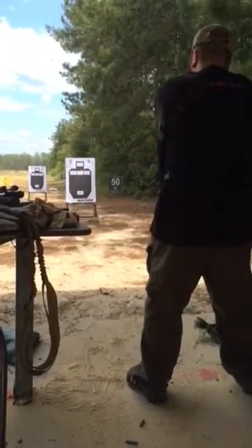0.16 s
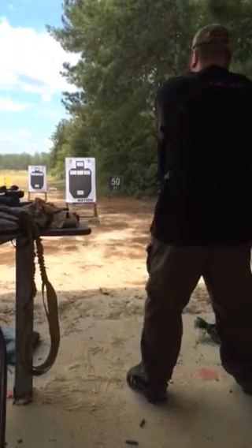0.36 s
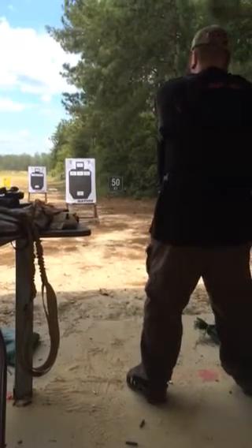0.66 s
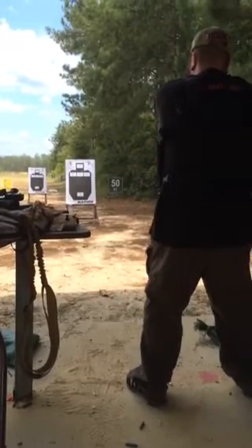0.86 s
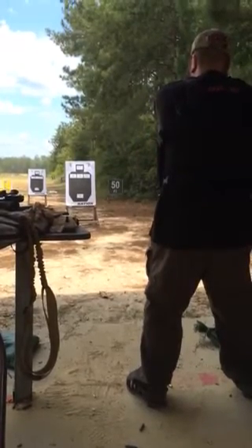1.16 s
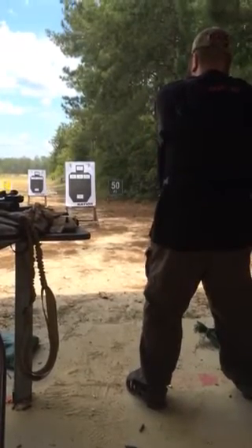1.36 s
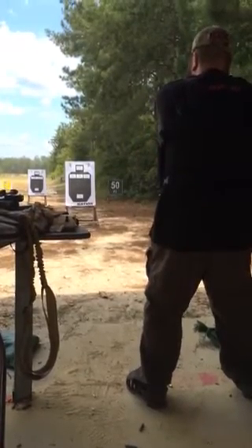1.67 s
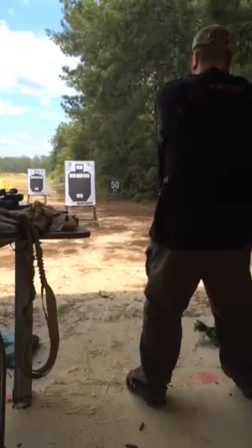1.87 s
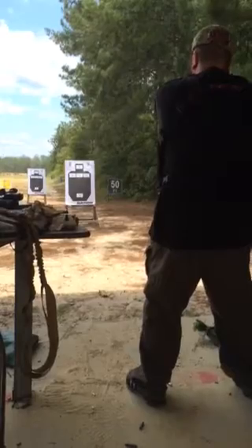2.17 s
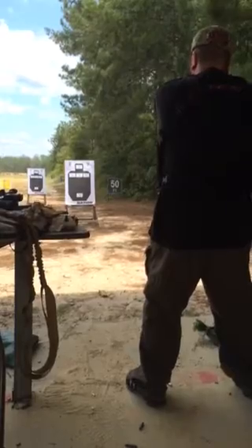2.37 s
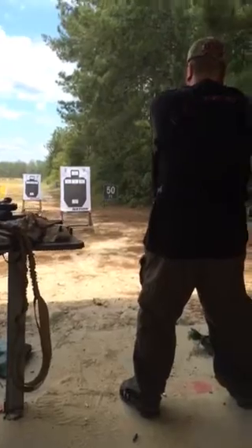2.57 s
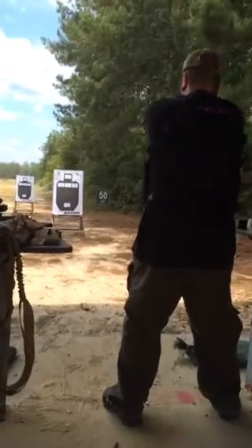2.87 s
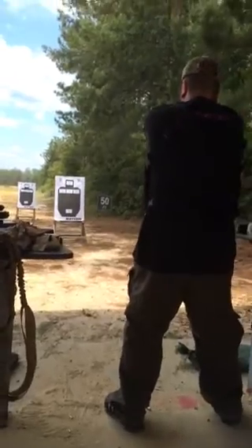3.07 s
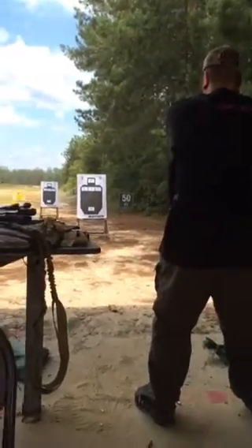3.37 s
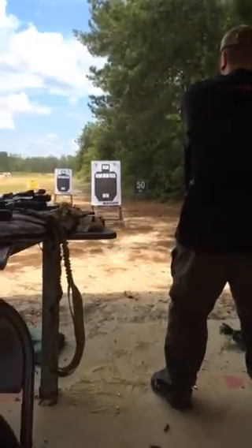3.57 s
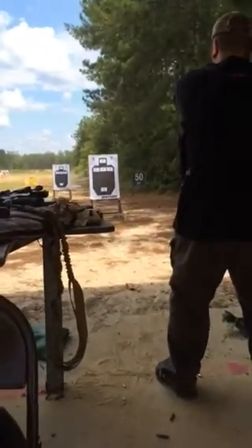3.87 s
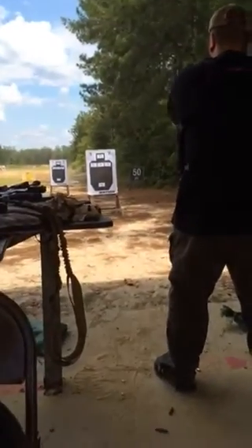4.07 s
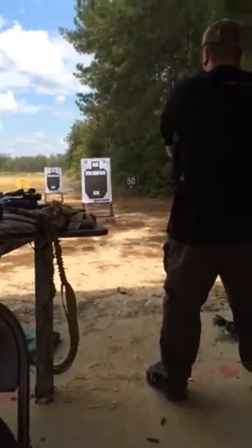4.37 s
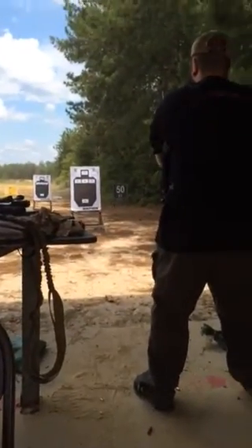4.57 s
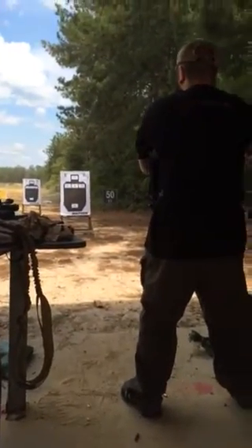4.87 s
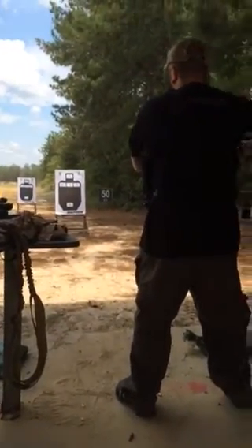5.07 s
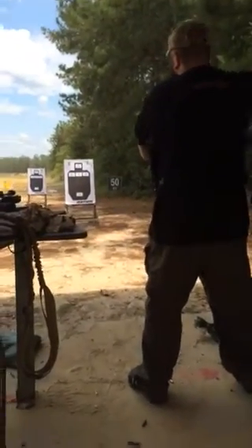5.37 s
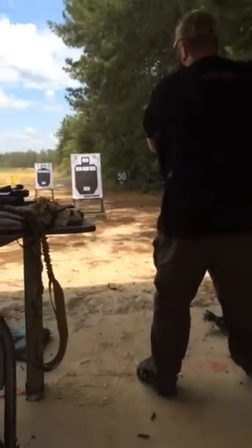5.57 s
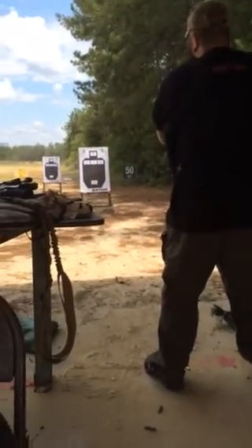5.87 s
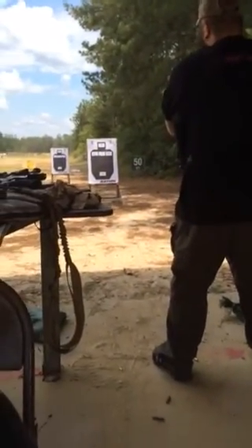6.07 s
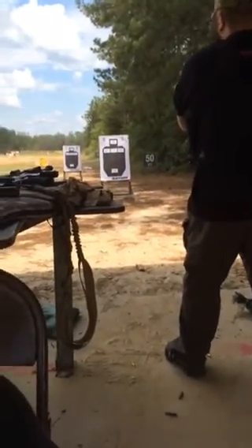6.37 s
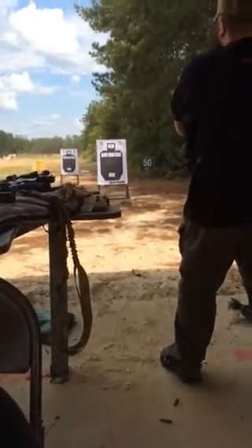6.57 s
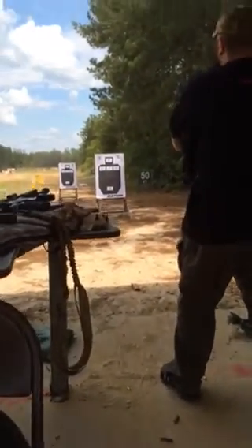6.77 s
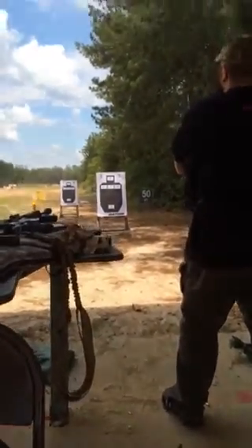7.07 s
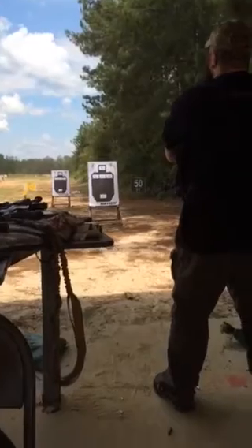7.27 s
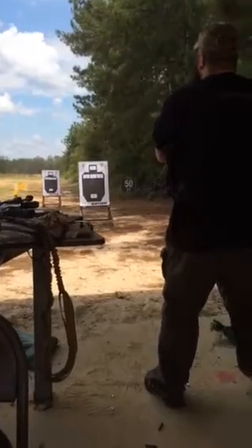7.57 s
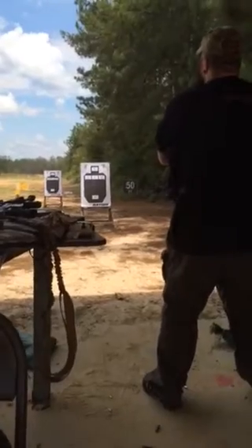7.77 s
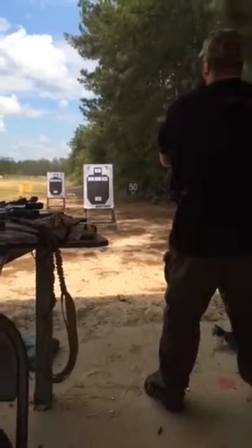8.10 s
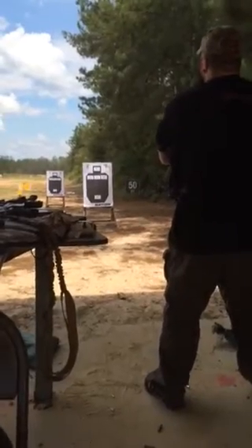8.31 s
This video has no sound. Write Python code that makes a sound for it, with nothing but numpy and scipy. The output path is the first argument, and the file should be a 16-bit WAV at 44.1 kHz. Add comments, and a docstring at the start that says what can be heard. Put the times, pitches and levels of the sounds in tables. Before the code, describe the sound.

Close, slightly squashed sound from a handheld microphone behind a shooter: distant pops and a low engine drone, two violent pistol blasts with dense shelter reverberation and long forest echo, small metal clicks, a loud steel clack that rings, a casing tinkle, dull gear knocks, soft swishes, then the drone sinks to a faint hum under far grainy reports.

```python
"""Pistol shots on an outdoor firing line

Two shots under a roof overload a fast limiter; each is a noise burst with roof and tree echoes made of dying noise.
Gun parts clack as shaped noise; they and a casing ring as fading sines; faint far reports are grainy rushes of noise.
A far engine, a stack of sines, drones, then the drone sinks to a low hum.
Soft swishes, a squeak, a whine and quiet air are around it."""
import sys
import numpy as np
from scipy import signal
from scipy.fft import rfft, irfft, next_fast_len
from scipy.io import wavfile
from scipy.ndimage import uniform_filter1d, map_coordinates

SR = 44100
rng = np.random.default_rng(int(sys.argv[2]) if len(sys.argv) > 2 else 0)


def master(y):
    """Save y as 16-bit WAV."""
    cut = np.clip(np.atleast_2d(y).T, -1, 1)
    pcm = np.round(cut * 32767)  # scale
    wavfile.write(sys.argv[1], SR, pcm.astype(np.int16))


N = 372204


def amp(db):
    """Turn decibels into a gain."""
    return 10 ** (np.asarray(db) / 20)


def unit(x):
    """Scale to an rms of 1."""
    return x / np.sqrt(np.mean(x ** 2) + 1e-20)


def along(points, hz):
    """Read a curve of (Hz, value) points, spaced evenly in log pitch."""
    point_hz, values = np.transpose(points)
    return np.interp(np.log(hz + 1), np.log(point_hz + 1), values)


def wobble(rate):
    """Draw a smooth random curve with rate random knots a second."""
    knots = rng.standard_normal(int(N * rate / SR) + 4)
    return map_coordinates(knots, [np.arange(N) * rate / SR])


def noise(colour, size):
    """Make noise of rms 1 from random phases; colour(hz) gives the shape of its spectrum in dB."""
    hz = np.fft.rfftfreq(size, 1 / SR)
    phases = np.exp(2j * np.pi * rng.random(len(hz)))
    return unit(irfft(phases * amp(colour(hz)), size))


def tilted(points, tilt, hz):
    """Lean a spectrum by tilt dB per octave above 900 Hz."""
    return along(points, hz) + tilt * np.log2(np.maximum(hz, 900))


def dying(x, t60s):
    """Let each frequency die at its own speed, falling 60 dB in its t60."""
    hz, t, frames = signal.stft(x, SR, nperseg=512)
    fade = amp(-60 * t / along(t60s, hz)[:, None])
    return signal.istft(frames * fade, SR, nperseg=512)[1][:len(x)]


def add(track, s, sound):
    """Mix a sound into the track at s seconds."""
    start = max(round(s * SR), 0)
    track[start:start + len(sound)] += sound[:N - start]


def walls(hz, depth_db, farthest, count=12):
    """Ripple a spectrum as nearby surfaces do, their reflections up to farthest seconds late."""
    delays = farthest * rng.uniform(.15, 1, (count, 1))
    ripple = unit(np.cos(2 * np.pi * delays * hz).sum(axis=0))
    return depth_db * ripple * hz / (hz + 700)  # weaker in the bass


def surges(returns, t):
    """Give the lift in dB from a table of echoes, each a smooth bump in time."""
    return sum(db * np.exp(-((t - delay) / length) ** 2) for delay, length, db in returns)


# Spectrum of the outdoor air: pitch_hz, relative level_db
AIR_SPECTRUM = [(20, -18.5), (45, -4.5), (65, -0.5), (115, -10), (165, -3), (280, -16), (600, -18),
                (1200, -23.5), (2500, -28.5), (5000, -34), (10000, -39.5), (15500, -47.5)]


def air(level_db=-59.5, sway_db=1, buffet_db=3, buffet_hz=250):
    """Quiet leaf hiss lies over a rumble that the breeze stirs in quick lumps."""
    steady = noise(lambda hz: along(AIR_SPECTRUM, hz), next_fast_len(N))[:N]
    bass = signal.sosfiltfilt(signal.butter(2, buffet_hz, fs=SR, output="sos"), steady)
    hiss = steady - bass
    lumps = unit(amp(buffet_db * wobble(15)))
    return amp(level_db + sway_db * wobble(1.6)) * (hiss + lumps * bass)


# Lines of the drone: multiple of the five-firing cycle, relative level_db
ENGINE_LINES = [(4, -12.5), (5, 0.5), (6, -5), (7, -15.5), (8, -15.5), (9, -13), (10, -14.5), (11, -15),
                (12, -19)]
# Loudness of the drone over time: time_s, level_db
ENGINE_LOUDNESS = [(0, -50.5), (1.15, -48), (1.5, -55), (3, -62.5), (4.5, -57.5), (5.4, -63), (6.25, -59.5),
                   (6.55, -82), (8.44, -63)]
# Firing rates: the engine picks up to its working speed, then its drone sinks to a low hum
START_HZ, WORK_HZ, LOW_HUM_HZ = 85, 92, 58
PICK_UP_S, SINK_AT_S, SINK_S = .6, 5.4, .25


def engine(unsteady_db=2.0, throb_db=1.3):
    """Uneven firings put lines at multiples of the engine cycle, which throb together once a cycle."""
    t = np.arange(N) / SR
    working_hz = WORK_HZ + (START_HZ - WORK_HZ) * np.exp(-t / PICK_UP_S)
    height = (1 - np.tanh((t - SINK_AT_S) / SINK_S / 2)) / 2  # 1 for the drone, 0 for the low hum
    firing_hz = LOW_HUM_HZ + (working_hz - LOW_HUM_HZ) * height
    cycle = 2 * np.pi * np.cumsum(firing_hz / 5) / SR  # phase; five firings make one cycle
    lines = sum(amp(db + unsteady_db * wobble(5.9)) * np.sin(multiple * cycle) for multiple, db in ENGINE_LINES)
    level_db = np.interp(t, *np.transpose(ENGINE_LOUDNESS))
    return amp(level_db + throb_db * wobble(20)) * unit(lines)


def whine(level_db=-71, pitch_hz=760, width_hz=20, middle=.9, length=.6):
    """A faint whine, a narrow band of noise, comes and goes in the distance."""
    band = noise(lambda hz: -20 * np.log10(1 + ((hz - pitch_hz) / width_hz) ** 2), next_fast_len(N))[:N]
    swell = np.exp(-((np.arange(N) / SR - middle) / length) ** 2)
    return amp(level_db) * band * swell


# Spectrum of far reports and swishes: pitch_hz, relative level_db
FAR_SPECTRUM = [(300, 1), (1000, -0.5), (1700, -2.5), (2700, 1), (4500, -6), (7000, -9.5), (10000, -16.5),
                (15500, -25)]
GROUND_COMB_HZ = 880  # spacing of the peaks made by the bounce off the ground


def far_rush(tilt, low_hz, size, edge_damping=0.78, grain_db=2.2, ground_db=0.5):
    """A grainy rush with a steep lower edge is combed by its bounce off the ground."""
    high_pass = lambda ratio: ratio ** 2 / abs(1 - ratio ** 2 + 1j * edge_damping * ratio)
    edge = lambda hz: 2 * 20 * np.log10(high_pass(hz / low_hz) + 1e-6)  # the filter twice over
    ground = lambda hz: ground_db * np.cos(2 * np.pi * hz / GROUND_COMB_HZ) / (1 + (hz / 4000) ** 2)
    ripple = lambda hz: walls(hz, depth_db=4, farthest=.008)
    rush = noise(lambda hz: tilted(FAR_SPECTRUM, tilt, hz) + edge(hz) + ground(hz) + ripple(hz), size)
    trunks = wobble(500)[:size]
    return unit(rush * amp(grain_db * trunks))


# Spectrum of dull bodies and thuds: pitch_hz, relative level_db
KNOCK_SPECTRUM = [(40, -37), (150, -2), (300, -1.5), (450, -0.5), (700, -6.5), (1200, -11.5), (3000, -25),
                  (10000, -72)]
# Reports from other lanes: start_s, level_db, hold_s (from the start), tilt_db_per_octave, dull_body_db
FAR_REPORTS = [(.027, -52, .085, 4.5, -60), (.075, -47.5, .04, -6, -59), (.536, -50.5, .012, 6, -54),
               (.702, -48.5, 0.03, 1.5, -53), (5.85, -56.5, .05, 2.5, -57), (6.263, -43.5, 0.024, 1.5, -52),
               (6.971, -45.5, 0.048, 1, -60), (7.306, -52.5, 0.054, 3, -67), (7.642, -42.5, 0.055, 0, -66),
               (7.962, -45, 0.074, .5, -66)]
REPORT_RISE_S, REPORT_LOW_HZ = .01, 980
EDGE_CLIMB = .08  # octaves the lower edge climbs per dB of tilt, so a brighter report has less bass


def reports(t60=0.25):
    """A far crack comes back from many trees at once: it rises, holds and dies, over a dull body."""
    out, t = np.zeros(N), np.arange(SR // 2) / SR
    for s, db, hold, tilt, body_db in FAR_REPORTS:
        body = amp(body_db) * noise(lambda hz: along(KNOCK_SPECTRUM, hz), len(t))
        shape = np.minimum(t / REPORT_RISE_S, 1) * amp(-60 * np.maximum(t - hold, 0) / t60)
        rush = far_rush(tilt, REPORT_LOW_HZ * 2 ** (EDGE_CLIMB * tilt), len(t))
        add(out, s, (amp(db) * rush + body) * shape)
    return out


def squeak(middle=0.065, length=0.014, pitch_hz=791, level_db=-41):
    """A brief, nearly pure squeak is one sine that swells and fades."""
    t = np.arange(N) / SR
    return amp(level_db) * np.sin(2 * np.pi * pitch_hz * t) * np.exp(-((t - middle) / length) ** 2)


# Soft swishes: peak_s, level_db, tilt_db_per_octave
SOFT_SWISHES = [(.205, -64, 6), (5.14, -55, 4), (6.105, -53, -2.5), (6.638, -51, 0.5)]
SWISH_S, SWISH_LOW_HZ = .05, 1350


def swishes():
    """The rush of a far report, but without an attack, swells and fades evenly."""
    out, t = np.zeros(N), np.arange(SR // 3) / SR
    middle = t.mean()
    swell = np.exp(-((t - middle) / SWISH_S) ** 2)
    for s, db, tilt in SOFT_SWISHES:
        add(out, s - middle, amp(db) * far_rush(tilt, SWISH_LOW_HZ, len(t)) * swell)
    return out


# Spectrum of clatter: pitch_hz, relative level_db
CLATTER_SPECTRUM = [(200, -31), (700, -18), (1250, -0.5), (1800, 1.5), (2600, -2.5), (4000, -4),
                    (6500, -4.5), (10000, -12), (15500, -21)]
CLATTER_LOW_HZ = 700  # clatter has little bass below this edge


def contact(level_db, snap_db, thud_db, body_hz, tilt, t60, lift_db,
            snap_length=0.0034, thud_t60=.35, thud_rise=0.0026, body_q=7):
    """A hard contact snaps in the part's own resonance, then clatters under the roof over a dull thud."""
    t = np.arange(SR // 2) / SR
    body = lambda hz: lift_db / (1 + (2 * body_q * (hz / body_hz - 1)) ** 2)
    ripple = lambda hz: walls(hz, depth_db=3.5, farthest=.004)
    snap = amp(snap_db) * np.exp(-(t / snap_length) ** 4)
    shape = snap + amp(-60 * t / t60)
    clatter = noise(lambda hz: tilted(CLATTER_SPECTRUM, tilt, hz) + body(hz) + ripple(hz), len(t)) * shape
    clatter = signal.sosfilt(signal.butter(2, CLATTER_LOW_HZ, "high", fs=SR, output="sos"), clatter)
    thud_shape = amp(-60 * t / thud_t60) * (1 - np.exp(-t / thud_rise))
    thud = noise(lambda hz: along(KNOCK_SPECTRUM, hz), len(t)) * thud_shape
    return amp(level_db) * clatter / np.sqrt(2) + amp(thud_db) * thud  # clatter sits 3 dB below level_db


# Sharp clicks of steel gun parts: start_s, clatter_db (before a 3 dB cut), snap_db (above the clatter),
# thud_db, body_hz
STEEL_CLICKS = [(.796, -52, 0, -56, 4600), (.83, -46.5, 4, -56, 2400), (2.4722, -33.5, 1.5, -64, 4240),
                (2.637, -42.5, 2, -50, 4000), (3.778, -50, 0, -56, 7000), (3.9085, -35.5, 4, -65, 4300),
                (4.2929, -23, 0, -37, 3060), (4.4679, -41, 5.5, -42, 6200), (4.562, -53, 3, -55, 10500),
                (6.4989, -28, 8, -63, 1280), (6.856, -38.5, 2.5, -42.5, 6600)]
# Duller knocks of gear on the bench: start_s, clatter_db (before a 3 dB cut), thud_db, body_hz
BENCH_KNOCKS = [(4.490, -31.5, -37.5, 2280), (4.664, -59, -47, 1500), (4.785, -47.5, -37, 2780),
                (5.124, -52.5, -54.5, 3400), (5.451, -41.5, -44.5, 3160), (5.518, -55, -44.5, 1790),
                (5.661, -55.5, -52, 1900), (5.711, -47.5, -53.5, 1750)]


def clacks():
    """Steel on steel is bright; gear on the bench is duller and rings more in its body."""
    out = np.zeros(N)
    for s, db, snap_db, thud_db, body_hz in STEEL_CLICKS:
        add(out, s, contact(db, snap_db, thud_db, body_hz, tilt=2.1, t60=0.21, lift_db=7.5))
    for s, db, thud_db, body_hz in BENCH_KNOCKS:
        add(out, s, contact(db, 2.5, thud_db, body_hz, tilt=-4.5, t60=.22, lift_db=11))
    return out


# Spectrum of the shelter's reverberation: pitch_hz, relative level_db
SHELTER_SPECTRUM = [(30, -37), (70, -22.5), (130, -10), (300, -3), (600, 0.5), (1200, 1.5), (1700, -4.5),
                    (3000, -5.5), (5000, -10), (8000, -13.5), (12000, -22), (15500, -27.5)]
# How fast the shelter dies away: pitch_hz, t60_s
SHELTER_DECAY = [(70, 0.78), (170, .75), (400, 0.56), (1000, 0.48), (4000, 0.45), (8000, 0.4), (14000, 0.4)]
# Resonances of the shelter: pitch_hz, width_hz, lift_db
ROOF_RESONANCES = [(123, 24, 6), (310.4, 22, 9.5), (396, 40, 6), (468, 37, 5), (584, 19, 3),
                   (659.5, 61, 4.5), (685, 14, 5.5), (734, 17, 5.5), (805, 50, 6), (880, 14, 5.5),
                   (932, 16, 5), (1139, 20, 5), (1236, 14, 6), (1620, 8.3, 4), (1937, 19, 6.5),
                   (2528, 13, 5.5), (3140, 26, 5)]
# Strong returns from posts, benches and the side bank: delay_s, length_s, lift_db
BANK_RETURNS = [(.065, .025, 4.5), (.115, .012, 4), (.205, .012, 1.5)]


def shelter(t, level_db=1, build=0.018, lumps_db=1.3):
    """Reflections pile up in lumps between slab and roof and ring at the shelter's resonances."""
    resonances = lambda hz: sum(db / (1 + (2 * (hz - f) / w) ** 2) for f, w, db in ROOF_RESONANCES)
    ripple = lambda hz: walls(hz, depth_db=1.5, farthest=.03)
    colour = lambda hz: along(SHELTER_SPECTRUM, hz) + resonances(hz) + ripple(hz)
    swell_db = level_db + surges(BANK_RETURNS, t) + lumps_db * wobble(200)[:len(t)]
    return amp(swell_db) * dying(noise(colour, len(t)), SHELTER_DECAY) * (1 - np.exp(-t / build))


# Spectrum of the forest's echo: pitch_hz, relative level_db
FOREST_SPECTRUM = [(30, -25), (70, -12), (140, -3), (300, -3.5), (600, 0), (1100, -1.5), (1700, -8.5),
                   (3000, -13), (5000, -19.5), (8000, -28.5), (12000, -36), (15500, -44)]
# How fast the forest dies away: pitch_hz, t60_s
FOREST_DECAY = [(70, 6.1), (200, 5.84), (600, 4.25), (1500, 3.8), (4000, 3.36), (8000, 3.2), (14000, 2.2)]
# Clumps of trees that answer more strongly: delay_s, length_s, lift_db
TREE_CLUMPS = [(.245, .012, 1), (.403, .018, 3), (.545, .02, 2), (.655, .014, 5), (.795, .035, 4)]


def forest(t, level_db=-28, build=.3, lumps_db=1.6):
    """Countless trunks scatter the blast back in lumps; denser clumps stand out as echoes."""
    colour = lambda hz: along(FOREST_SPECTRUM, hz) + walls(hz, depth_db=2.0, farthest=0.018)
    swell_db = level_db + surges(TREE_CLUMPS, t) + lumps_db * wobble(45)[:len(t)]
    return amp(swell_db) * dying(noise(colour, len(t)), FOREST_DECAY) * (1 - np.exp(-t / build))


def roll(t, level_db=-28, centre_hz=210, steepness=13, t60=2.6, build=.15):
    """The bass rolls back from the nearby ground and banks sooner than the forest answers."""
    rumble = noise(lambda hz: -steepness * np.log2((hz + 1) / centre_hz) ** 2, len(t))
    return amp(level_db - 60 * t / t60) * rumble * (1 - np.exp(-t / build))


def boom(t, level_db=-19, pitch_hz=70, delay=.065, length=.014):
    """The roof heaves briefly under the pressure wave: a low sine that swells and fades."""
    return amp(level_db) * np.sin(2 * np.pi * pitch_hz * (t - delay)) * np.exp(-((t - delay) / length) ** 2)


# Spectrum of the first blast: pitch_hz, relative level_db
BLAST_SPECTRUM = [(100, -27.5), (400, -9.5), (1000, -4.5), (1700, -1.5), (2500, -3.5), (4200, -1.5),
                  (8000, -5), (12000, -9), (15500, -11)]
# The pistol shots: start_s, level_db (added to the levels of blast and echoes)
PISTOL_SHOTS = [(1.2574, -1), (3.1024, -1)]


def pistol(blast_db=6, blast_t60=.2):
    """Each shot is a new bright blast, answered in the same way by the same surroundings."""
    out, t = np.zeros(N), np.arange(5 * SR) / SR
    answer = shelter(t) + forest(t) + roll(t) + boom(t)
    for s, db in PISTOL_SHOTS:
        blast = noise(lambda hz: along(BLAST_SPECTRUM, hz), len(t)) * amp(blast_db - 60 * t / blast_t60)
        add(out, s, amp(db) * (blast + answer))
    return out


# Ringing tones of a heavy steel gun part: pitch_hz, relative level_db, t60_s
HEAVY_PART = [(1980, -4.5, 0.19), (2110, -2.5, 0.1), (2370, -6.5, 0.13), (3280, -15, 0.14),
              (3970, -6.5, 0.12), (5500, -20, .13), (7060, -14, 0.16), (8603, -14, 0.16),
              (10510, -15, 0.17), (11300, -16, .11), (13010, -19, .1), (13970, -22, .13)]
# Ringing tones of a light gun part and a shell casing landing: pitch_hz, relative level_db, t60_s
LIGHT_PART_AND_CASING = [(1604, 2, 0.13), (3900, -10, .11), (6080, -4, 0.087), (7047, -21, 0.45),
                         (7644, -21.5, .2), (9800, -12, .11), (13510, -28, .35)]


def ringing_metal(s, modes, level_db):
    """Struck metal rings in its modes, each a sine that dies at its own speed."""
    out, t = np.zeros(N), np.arange(SR) / SR
    for hz, db, t60 in modes:
        add(out, s, amp(db - 60 * t / t60) * np.sin(2 * np.pi * hz * t) * rng.choice([-1, 1]))
    return amp(level_db) * out


def scene():
    """Mix everything heard on the firing line."""
    background = air() + engine() + whine()
    far = reports() + squeak() + swishes()
    heavy_ring = ringing_metal(4.2928, HEAVY_PART, level_db=-20.5)
    light_ring = ringing_metal(4.4678, LIGHT_PART_AND_CASING, level_db=-30.5)
    return (background + far + clacks() + pistol() + heavy_ring + light_ring)[None]


TOP_HZ = 15400  # upper end of the band


def record(dry, ceiling_db=-12.0, window=.008):
    """A fast limiter holds the blast at a ceiling, peaks round off, and the band ends steeply."""
    power = uniform_filter1d(dry ** 2, max(int(window * SR), 1))
    loudness = np.sqrt(abs(power) + 1e-12)
    held = dry * np.minimum(1, amp(ceiling_db) / loudness)
    rounded = held / (1 + abs(held / .7) ** 6) ** (1 / 6)
    size = next_fast_len(N + SR // 2)
    low_pass = 1 / (1 + (np.fft.rfftfreq(size, 1 / SR) / TOP_HZ) ** 160)
    return irfft(rfft(rounded, size) * low_pass, size)[:, :N]


dry = scene()
out = record(dry)
master(out)
```